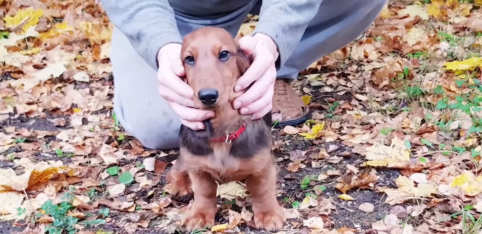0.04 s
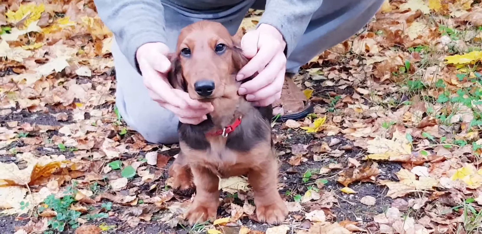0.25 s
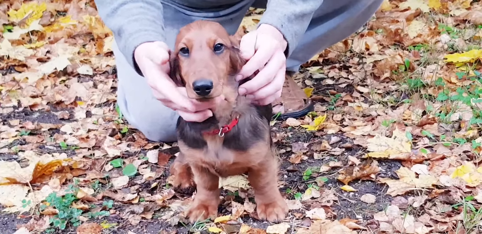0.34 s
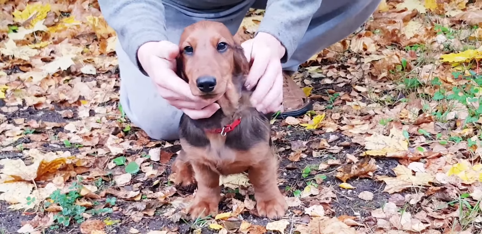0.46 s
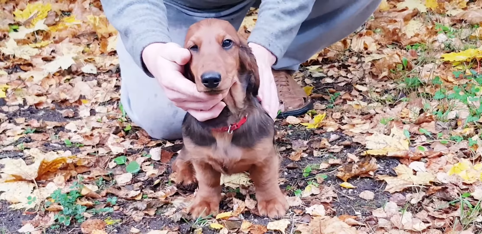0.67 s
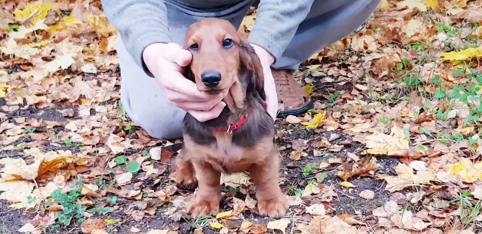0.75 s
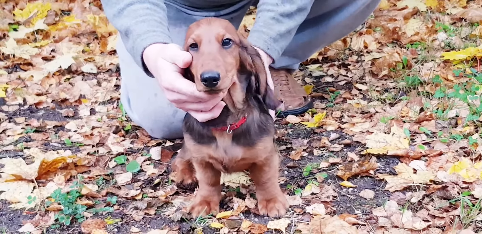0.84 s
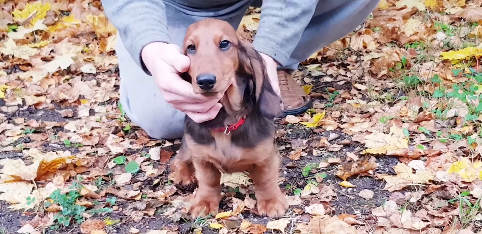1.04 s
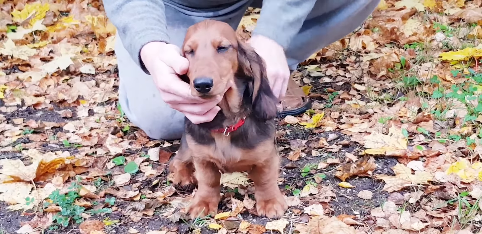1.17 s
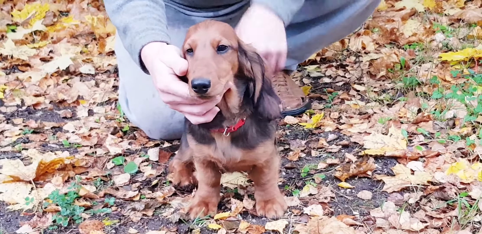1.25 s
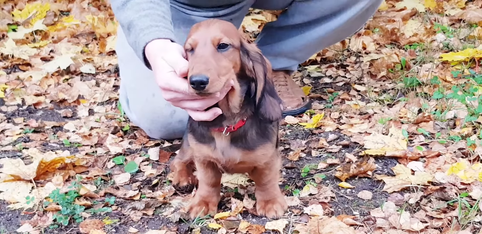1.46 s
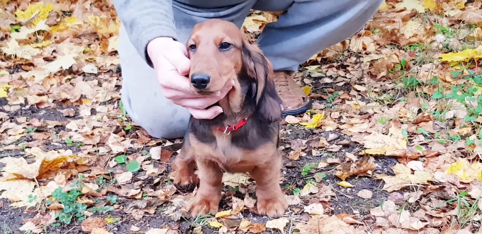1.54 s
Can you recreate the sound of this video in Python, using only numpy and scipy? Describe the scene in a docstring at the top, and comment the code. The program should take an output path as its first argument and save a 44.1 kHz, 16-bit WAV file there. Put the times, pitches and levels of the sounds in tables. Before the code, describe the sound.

Raindrops pop on a taut umbrella close to the microphone outdoors, each a short hollow knock with a bright splash, the biggest adding a slight thump. Strong drops land at about 0.2, 0.3 and 0.4 seconds. After a brief lull, an uneven run follows from 0.7 to 1.3 seconds, loudest near 1.1 and 1.2, then lighter taps. Tiny drips, soft hiss and faint rumble continue underneath.

```python
"""Raindrops on an umbrella

Outdoors, raindrops pop on taut cloth close to a stereo microphone. Each drop gives a hollow knock,
a short ring and a bright splash, and the big ones shake a low thump loose. Between them, fine ticks,
tiny drips and faint splashes sprinkle over a soft hiss and rumble."""
import sys
import numpy as np
from scipy import signal
from scipy.io import wavfile

SR = 44100
rng = np.random.default_rng(int(sys.argv[2]) if len(sys.argv) > 2 else 0)


def put_to_file(sound):
    """Save the sound as 16-bit audio at rate SR, in the file named by the first command-line argument."""
    columns = np.atleast_2d(sound).T  # one column per channel
    safe = np.clip(columns, -1, 1)
    whole_steps = np.round(safe * 32767)
    wavfile.write(sys.argv[1], SR, whole_steps.astype(np.int16))


N = 70560

# How loud the background hiss is over time: time_s, treble_db, middle_db
HISS_LEVELS = [(0.0, -54.5, -56), (0.4, -53.5, -55.5), (0.56, -55.5, -56), (0.7, -52.5, -57.5),
               (0.9, -56, -55.5), (1.25, -55, -55), (1.6, -57, -57.5)]
# The tone of that hiss: pitch_hz, relative_db
HISS_TONE = [(53, -28), (90, -2.5), (292, -15), (504, -9.5), (730, -38), (908, -9), (7360, -15.5),
             (15000, -22)]
# How alike the two sides sound (1 is the same, 0 is unrelated, -1 is opposite): pitch_hz, likeness
LIKENESS = [(60, 0.98), (130, 1), (290, 0.67), (640, -0.12), (1410, -0.13), (3100, 0.11), (6820, -0.39),
            (15000, 0.27)]
# How loud the rumble is over time: time_s, level_db
RUMBLE_LEVELS = [(0.0, -54), (1.372, -55), (1.6, -61)]
# One drop a row, with levels before the gains in raindrops(). A "fade" is always a fall of 60 dB.
# start_s, knock_hz, knock_db, ring_hz, ring_db, tick_hz, ring_and_tick_fade_cycles,
# splash_db, high_splash_db, splash_fade_s, left_over_right_db, right_delay_ms
DROPS = [(0.0408, 615, -67, 900.0, -51, 6740, 19, -35.5, -35, 0.017, -1, -0.063),
         (0.112, 310.0, -68, 954, -50, 3300.0, 31, -31.5, -36, 0.015, 3, -0.2),
         (0.1271, 750.0, -62, 2350, -36.5, 3120, 53, -44, -42, 0.012, 1.5, 0.068),
         (0.154, 585, -52, 1040, -36.5, 3200.0, 4, -42, -61, 0.034, 0, 0.13),
         (0.218, 452, -9.5, 1340, -7, 6950, 7.5, -18, -12, 0.012, 3, 0.088),
         (0.2817, 437, -16.5, 1133, -10.5, 4100, 7.5, -20, -15, 0.0027, 2.5, 0.041),
         (0.2985, 600, -23.5, 940, -23.5, 3500.0, 11.5, -31, -28, 0.0068, 5.5, 0.16),
         (0.4087, 596, -20.5, 950, -14, 3400, 1.5, -32, -33, 0.0087, 4.5, 0.19),
         (0.4656, 336, -60, 1840, -32, 9800.0, 3, -38, -33.5, 0.02, 2, -0.12),
         (0.5783, 480, -42, 1130, -36.5, 6500, 5.5, -32, -35, 0.014, 1, -0.12),
         (0.6249, 243, -54, 890, -57, 9400.0, 9, -38.5, -34, 0.029, 7, 0.15),
         (0.7354, 311, -31.5, 1160, -23.5, 3100, 10, -19.5, -15, 0.0093, 4, 0.17),
         (0.7396, 268, -34.5, 1340, -34, 3230, 20, -31, -46, 0.0094, 3, 0.47),
         (0.759, 328, -43.5, 2390, -37.5, 2860, 61, -49, -51, 0.013, 0.5, 0.053),
         (0.8004, 250.0, -68, 2530, -27.5, 3220, 5, -39, -36.5, 0.012, 5, 0.37),
         (0.8389, 544, -19, 836, -16.5, 3600, 3, -16.5, -20.5, 0.0055, 4.5, 0.31),
         (0.844, 500, -45, 2200, -44, 5400, 16, -37, -40, 0.013, -9, 0.34),
         (0.9, 480, -27.5, 870, -32.5, 4100, 8.5, -24, -33, 0.0086, 3.0, 0.25),
         (0.9249, 247, -53, 2150, -64, 3400, 31, -37.5, -39, 0.0066, 6, -0.067),
         (0.9517, 467, -35.5, 1570, -17, 6670, 9, -20, -15.5, 0.0026, 0, 0.133),
         (0.9827, 556, -48, 1510, -35, 4600.0, 6, -40, -45.0, 0.029, 1, -0.24),
         (0.9986, 520, -40.5, 1650, -31.5, 3640, 11, -39, -42, 0.0072, 2.5, 0.067),
         (1.077, 574, -56, 1230.0, -48, 4100.0, 10, -54, -40, 0.0094, 2.0, 0.09),
         (1.1067, 573, -13.5, 2230, -14, 5030, 7, -19, -20, 0.0084, 1.5, -0.068),
         (1.1098, 600, -35, 1530, -32, 3000, 10, -51, -55, 0.005, -4, 0.032),
         (1.2246, 465, -14, 1230, -9.5, 6000, 5.5, -19.5, -11.5, 0.0078, 2.0, 0.059),
         (1.2694, 700.0, -58, 1900, -35, 7400.0, 12, -45, -39, 0.016, 1, 0.19),
         (1.2764, 463, -41, 810, -38, 4700.0, 3, -39.5, -38.5, 0.052, 5.0, 0.22),
         (1.3297, 538, -19.5, 900.0, -21.5, 3170, 4.5, -12.5, -12, 0.0061, 3.5, 0.29),
         (1.3373, 343, -48, 1050, -42, 3200, 21, -27.5, -26, 0.017, 5.5, 0.24),
         (1.419, 540, -47, 1000, -33.5, 4800.0, 6.5, -42, -47, 0.018, 4.5, 0.52),
         (1.4241, 545, -39, 930, -39.5, 4200.0, 4.5, -33, -46, 0.0069, 4.5, 0.13),
         (1.4604, 620, -50, 1590.0, -50, 8700, 13, -32.5, -20, 0.0073, 4.5, 0.0),
         (1.5567, 636, -59, 950, -40.0, 2940, 6.5, -37.5, -41, 0.0081, 4.5, 0.47)]
# Bands where the splash rings: low_hz, high_hz, relative_db
SPLASH_BANDS = [(6200, 7150, -7.5), (9600, 11140, -11)]
# Noise that lingers after a drop: low_hz, high_hz, relative_db, fade_s
DROP_TAILS = [(42.7, 94, -26, .2), (134.5, 445, -19, 0.078), (400, 1130, -19, 0.044),
              (900, 2160, -13, 0.026), (2370, 8000, -28, 0.072), (5960, 14800, -33, 0.076)]
# Fine ticks with no knock: start_s, pitch_hz, unfiltered_db, fade_s, left_over_right_db
FINE_TICKS = [(0.111, 12500, -34, .01, 0), (0.185, 6200, -31, 0.015, 2), (0.474, 8500, -33.5, 0.012, 1),
              (0.5137, 11000, -39, .01, 4), (0.5205, 9500, -39.5, .012, 9), (0.556, 2500, -36, 0.025, 6),
              (0.635, 8500, -37, 0.017, 9), (0.6676, 12600, -34, 0.012, 6), (0.8628, 11400, -40, .015, 3),
              (0.877, 4200, -36, .012, 3), (0.9, 8100, -24.5, 0.0085, 5), (0.9243, 12500, -35, 0.0087, 3),
              (0.939, 3020, -32.5, 0.026, 2), (1.017, 11100, -36.5, .012, 2),
              (1.1141, 7900, -28, 0.0097, 6), (1.1596, 6600, -33.5, 0.013, 8.5),
              (1.2932, 7100, -32.5, 0.014, 5), (1.4043, 12600, -40.5, 0.026, 9)]


def from_db(db):
    """Turn decibels into a number to multiply by."""
    return 10 ** (np.asarray(db) / 20)


def pan(left_over_right_db):
    """Left and right gains that lean a sound to one side."""
    return from_db(left_over_right_db * np.array([[.5], [-.5]]))


def unit_level(x):
    """Scale a signal to an average power of 1."""
    return x / np.sqrt(np.mean(x ** 2) + 1e-20)


def at_hz(table, hz):
    """Read between the rows of a table of pitches."""
    pitches, values = np.transpose(table)
    return np.interp(np.log(hz), np.log(pitches), values)


def band(x, low_hz, high_hz):
    """Keep the sound between two pitches."""
    edges_hz = [low_hz, min(high_hz, .45 * SR)]
    return signal.sosfilt(signal.butter(2, edges_hz, "band", fs=SR, output="sos"), x)


def drift(rate_hz):
    """A smooth random wobble with a typical size of 1."""
    r = np.exp(-80 * np.pi * rate_hz / SR)
    slow = signal.lfilter([1], [1, -2 * r, r * r], rng.standard_normal(N // 40 + 2002))[2000:]
    return np.interp(np.arange(N) / 40, np.arange(len(slow)), unit_level(slow))


def stereo_noise(low_hz, high_hz, alike):
    """A band of noise with the given likeness between left and right."""
    mid, side = unit_level(band(rng.standard_normal((2, N + 4000)), low_hz, high_hz)[:, 4000:])
    alike = np.clip(alike, -1, 1)
    return (np.sqrt(1 + alike) * mid + np.sqrt(1 - alike) * side * np.array([[1], [-1]])) / np.sqrt(2)


def hiss(flicker_db):
    """Soft outdoor hiss: bands of noise that flicker a little. Treble and middle swell on their own."""
    treble, middle = np.zeros((2, 2, N))
    shared_flicker = 1.46 * drift(6)
    edges_hz = 25 * 2 ** np.arange(1.5, 9.6, .5)  # half an octave apart
    for low, high in zip(edges_hz, edges_hz[1:]):
        hz = np.sqrt(low * high)
        level_db = at_hz(HISS_TONE, hz) + flicker_db * (shared_flicker + drift(17))
        part = middle if hz < 3000 else treble
        part += np.sqrt(high - low) * from_db(level_db) * stereo_noise(low, high, at_hz(LIKENESS, hz))
    time_s, treble_db, middle_db = np.transpose(HISS_LEVELS)
    return pan(1.1) * sum(unit_level(part) * from_db(np.interp(np.arange(N) / SR, time_s, db))
                          for part, db in ((treble, treble_db), (middle, middle_db)))


def rumble():
    """A low, even rumble that sinks near the end."""
    time_s, level_db = np.transpose(RUMBLE_LEVELS)
    loudness = from_db(np.interp(np.arange(N) / SR, time_s, level_db))
    return loudness * stereo_noise(31.3, 77.4, alike=.94) * pan(1.6)


def tiny_drips(base_per_s=310, gain_db=-60.5, fade_cycles=6):
    """Tiny random drips patter in clumps, scattered left and right. Each rings for a few cycles."""
    sizes = from_db(5.5 * np.minimum(rng.exponential(1, N), 4)) * rng.choice([-1, 1], N)
    landings = rng.random(N) < base_per_s * from_db(5 * drift(15)) / SR
    clicks = sizes * landings * pan(rng.normal(1, 2.7, N))
    pitch_choice = rng.integers(0, 16, N)
    out = np.zeros((2, N))
    for k, hz in enumerate(np.geomspace(700, 13000, num=16)):
        decay, turn = from_db(-60 * hz / (fade_cycles * SR)), 2 * np.pi * hz / SR
        ringing = [1, -2 * decay * np.cos(turn), decay * decay]  # a filter that rings at this pitch
        out += signal.lfilter([0, np.sin(turn)], ringing, clicks * (pitch_choice == k) + 1e-18)
    return from_db(gain_db) * out


def faint_splashes(per_s=45, typical_db=-54.5, fade_s=.01):
    """Faint, short splashes of bright noise come at random moments."""
    landings = (rng.random(N) < per_s / SR) * from_db(rng.normal(0, 4.8, N))
    loudness = signal.lfilter([1], [1, -from_db(-60 / (fade_s * SR))], landings + 1e-18)
    return from_db(typical_db) * loudness * stereo_noise(3500, 16000, alike=.1) * pan(3)


def raindrops(knock_gain_db=3, ring_gain_db=5.5, tick_gain_db=6.5, splash_gain_db=-2.5):
    """Each drop pushes the taut cloth: three fading tones (knock, ring, tick), a splash and a tail."""
    lead_s, rise_s = .00017, .0001  # the push starts just before the tones crest
    knock_cycles, swell_share = 6.05, .0084
    t, out = np.arange(N) / SR, np.zeros((2, N))
    splashes, tails = np.zeros((3, 2, N)), np.zeros((len(DROP_TAILS), 2, N))
    waver = .57 * unit_level(band(rng.standard_normal(N), 67, 238))
    for (start_s, knock_hz, knock_db, ring_hz, ring_db, tick_hz, ring_cycles,
         splash_db, high_db, splash_fade_s, pan_db, delay_ms) in DROPS:
        first = max(int((start_s - .002) * SR), 0)
        span = slice(first, first + SR // 5)
        age = np.maximum(t[span] - start_s + lead_s - np.array([[0], [delay_ms / 1000]]), 0)
        push = (1 - np.exp(-age / rise_s)) * pan(pan_db)
        tick_db = splash_db if tick_hz < 6000 else high_db
        for hz, db, fade_cycles in ((knock_hz, knock_db + knock_gain_db, knock_cycles),
                                    (ring_hz, ring_db + ring_gain_db, ring_cycles),
                                    (tick_hz, tick_db + tick_gain_db, ring_cycles)):
            progress = age * hz / fade_cycles
            swell = 1 - np.exp(-progress / swell_share)
            rough = 1 + waver[span] * np.minimum(age * hz / 6, 1)
            tone = np.cos(2 * np.pi * hz * (age - lead_s))
            out[:, span] += push * swell * rough * from_db(db - 60 * progress) * tone
        top_db = high_db - .6 * (high_db + 52)  # louder drops have a smaller share of the very top
        for splash, db in zip(splashes, (splash_db, high_db, top_db)):
            splash[:, span] += push * from_db(db + splash_gain_db - 60 * age / splash_fade_s)
        source_dbs = (knock_db, knock_db, knock_db, ring_db, splash_db, high_db)
        for tail, db, (_, _, relative_db, fade_s) in zip(tails, source_dbs, DROP_TAILS):
            tail[:, span] += push * from_db(db + relative_db - 60 * age / fade_s)
    return out + bright_splash(*splashes) + lingering_noise(tails)


def bright_splash(splash, high_splash, top):
    """The bright splash of each drop: three loudness curves each shape a range of treble noise."""
    sheen = sum(from_db(db) * stereo_noise(low, high, alike=.046) for low, high, db in SPLASH_BANDS)
    out = .85 * splash * stereo_noise(1870, 6800, alike=.43)
    out += high_splash * (.36 * stereo_noise(4800, 13800, alike=.02) + sheen)
    return out + top * stereo_noise(12400, 13400, alike=.081)


def lingering_noise(tails):
    """A low thump and higher noise die away after each drop."""
    tails[2:] *= from_db(3 * drift(180))  # small after-splashes make the higher bands lumpy
    return sum(tail * stereo_noise(low, high, at_hz(LIKENESS, low))
               for tail, (low, high, _, _) in zip(tails, DROP_TAILS))


def fine_ticks(width_ratio=1.36, samples=2048):
    """Each fine tick is a short burst of noise in a band around its own pitch."""
    out, age = np.zeros((2, N + samples)), np.arange(samples) / SR
    for start_s, hz, db, fade_s, pan_db in FINE_TICKS:
        burst = rng.standard_normal((2, samples)) * from_db(db - 60 * age / fade_s)
        first = int(start_s * SR)
        out[:, first:first + samples] += band(burst, hz / width_ratio, hz * width_ratio) * pan(pan_db)
    return out[:, :N]


def scene():
    """Add the close rain to the soft background."""
    return raindrops() + fine_ticks() + tiny_drips() + faint_splashes() + hiss(flicker_db=1.62) + rumble()


def record(dry, bass_cut_hz=56.6, peak_limit=.93, treble_cut_hz=17000):
    """The microphone drops the deepest bass, rounds the tallest peaks and cuts the highest treble."""
    x = signal.sosfilt(signal.butter(2, bass_cut_hz, "high", fs=SR, output="sos"), dry)
    x = x / (1 + (x / peak_limit) ** 6) ** (1 / 6)
    return signal.sosfilt(signal.cheby2(14, 60, treble_cut_hz, fs=SR, output="sos"), x)


dry = scene()
out = record(dry)
put_to_file(out)
```